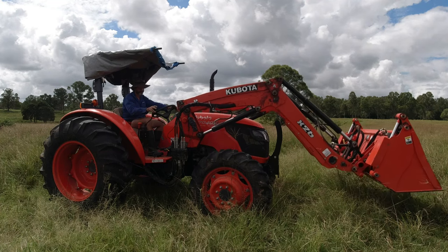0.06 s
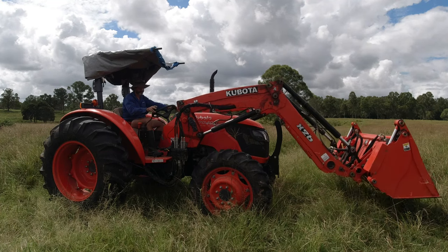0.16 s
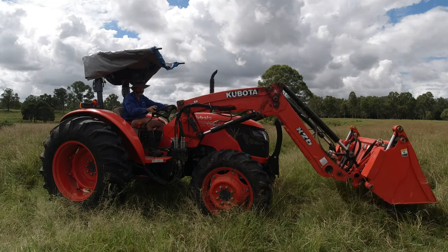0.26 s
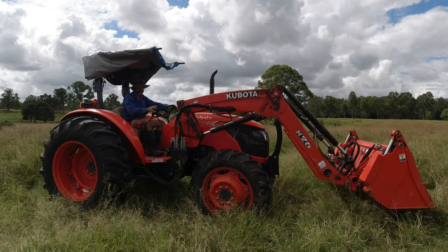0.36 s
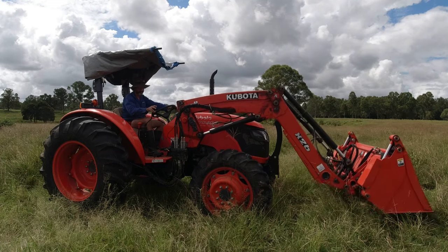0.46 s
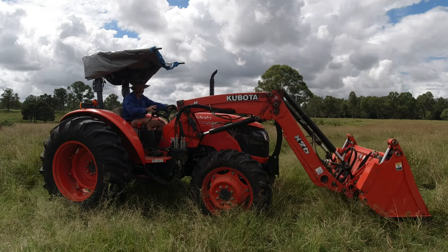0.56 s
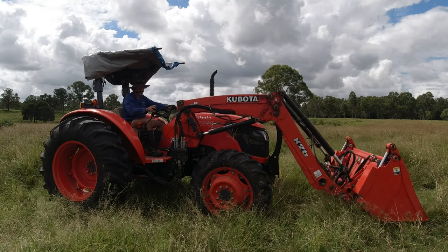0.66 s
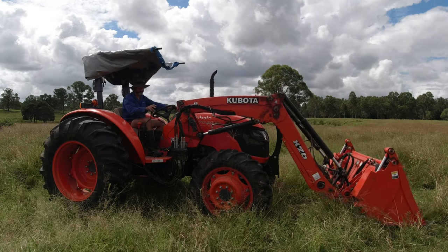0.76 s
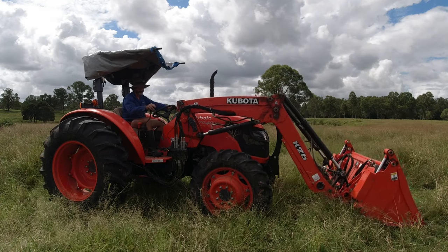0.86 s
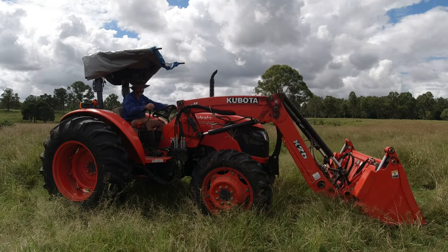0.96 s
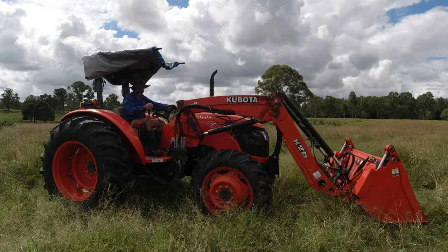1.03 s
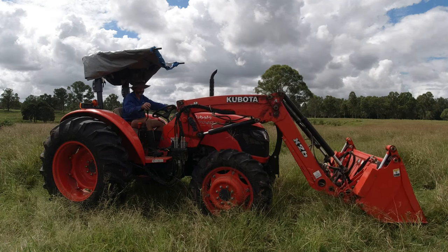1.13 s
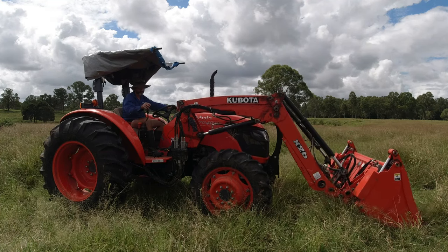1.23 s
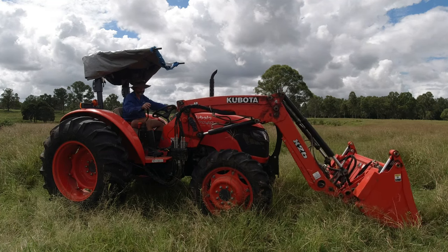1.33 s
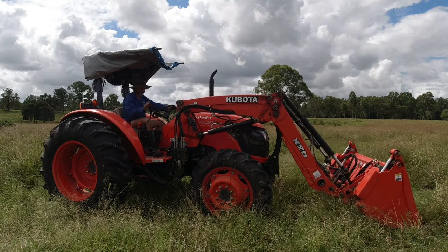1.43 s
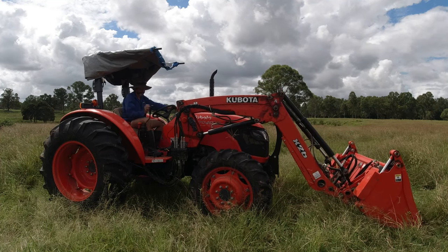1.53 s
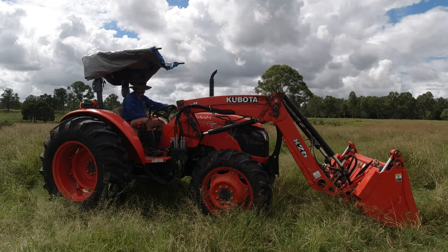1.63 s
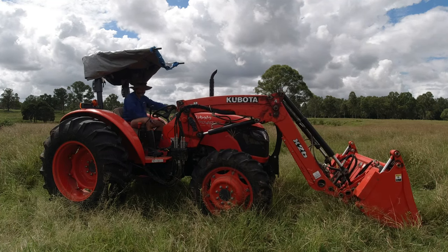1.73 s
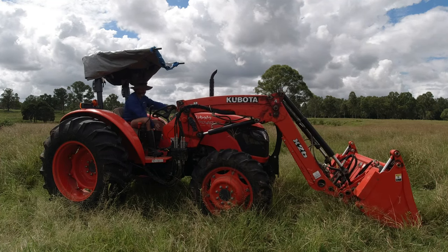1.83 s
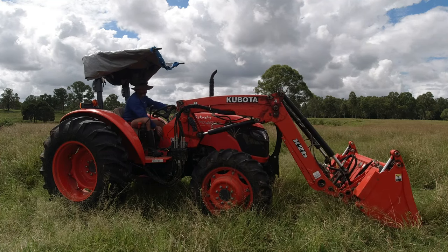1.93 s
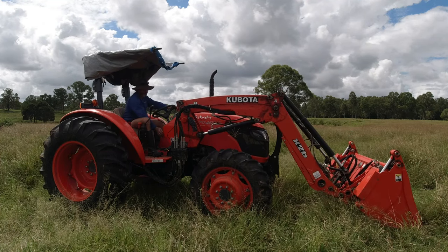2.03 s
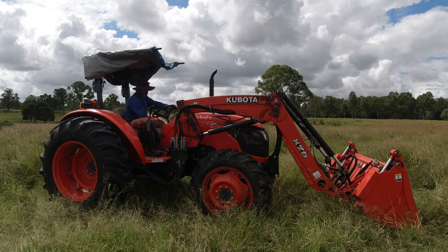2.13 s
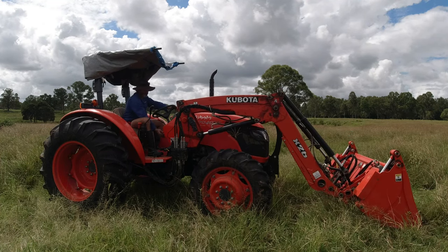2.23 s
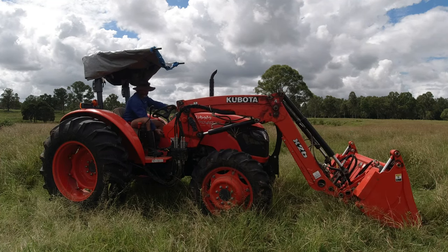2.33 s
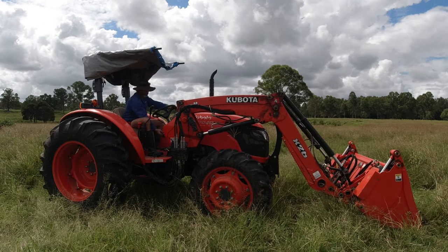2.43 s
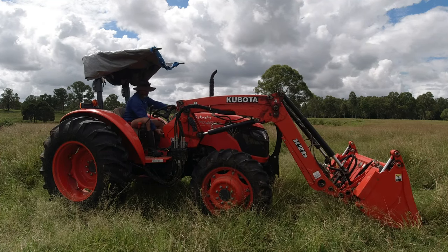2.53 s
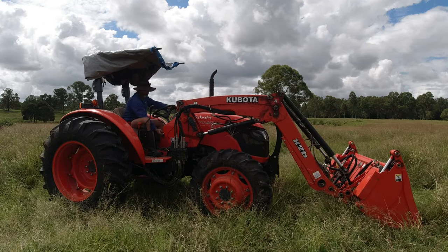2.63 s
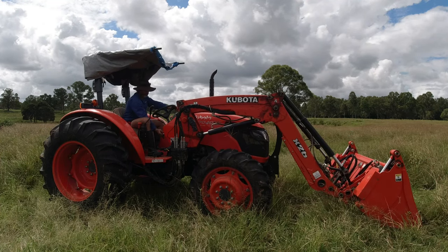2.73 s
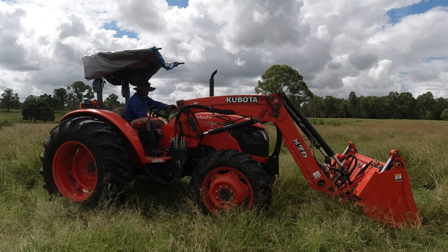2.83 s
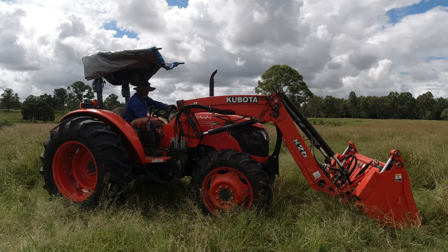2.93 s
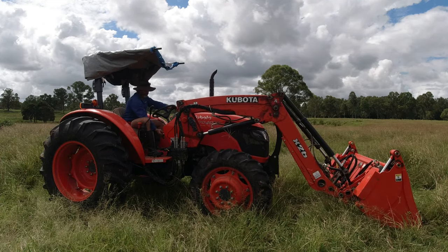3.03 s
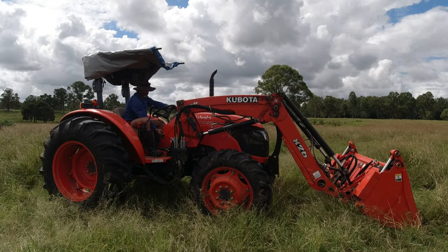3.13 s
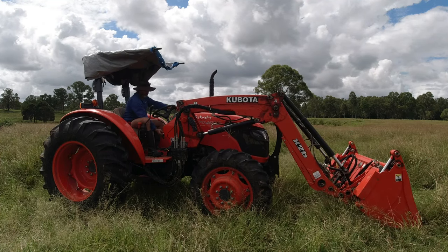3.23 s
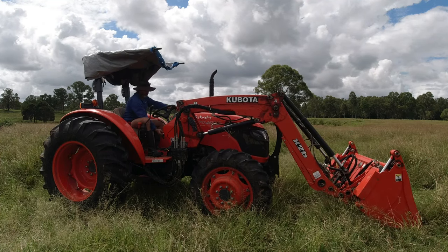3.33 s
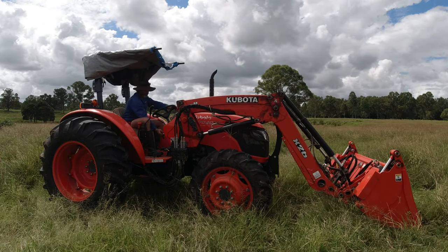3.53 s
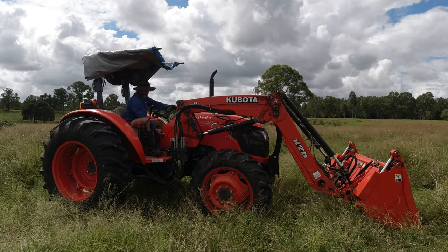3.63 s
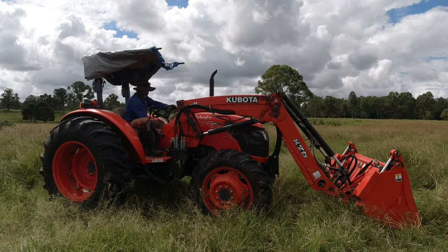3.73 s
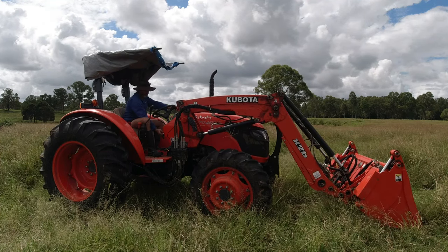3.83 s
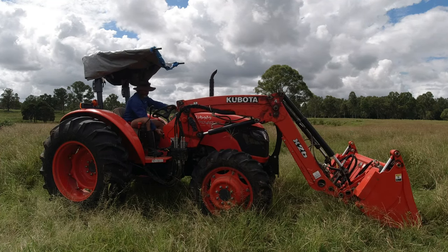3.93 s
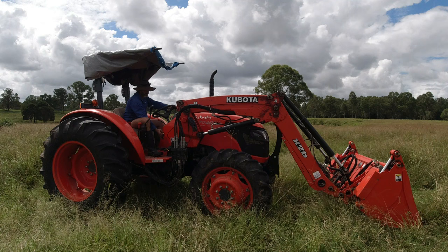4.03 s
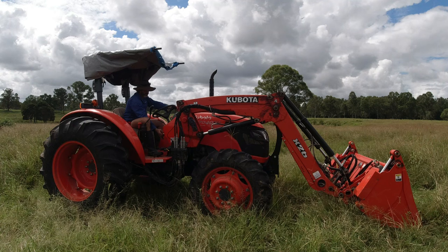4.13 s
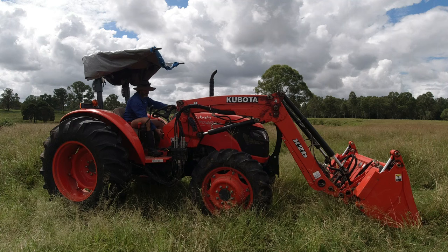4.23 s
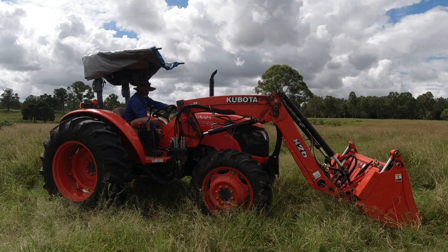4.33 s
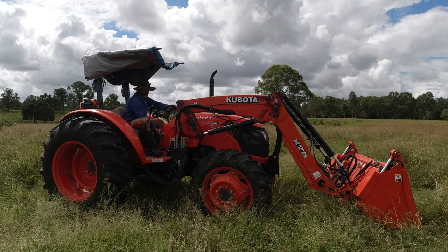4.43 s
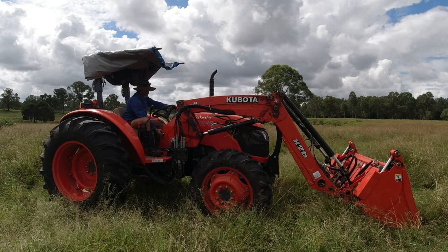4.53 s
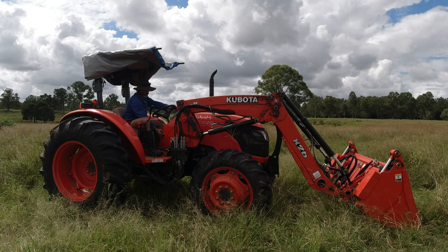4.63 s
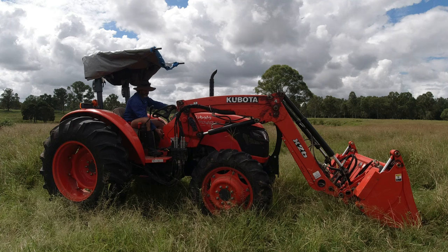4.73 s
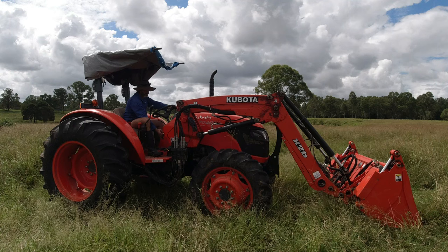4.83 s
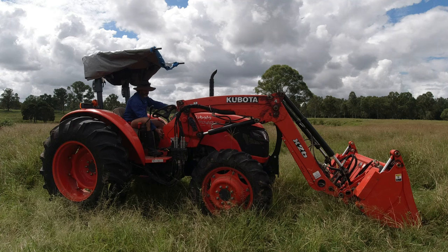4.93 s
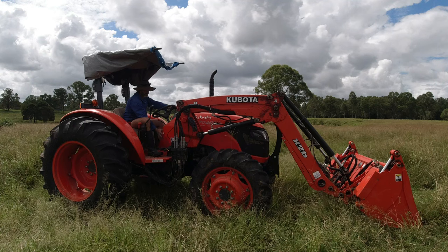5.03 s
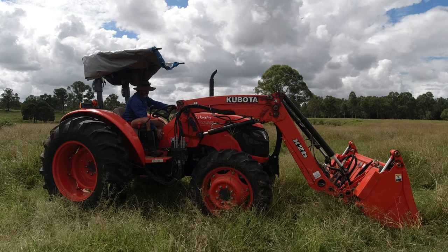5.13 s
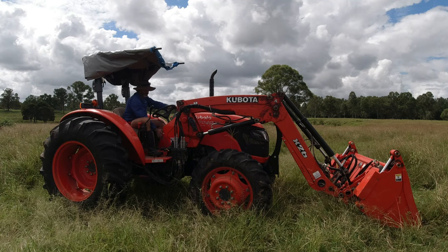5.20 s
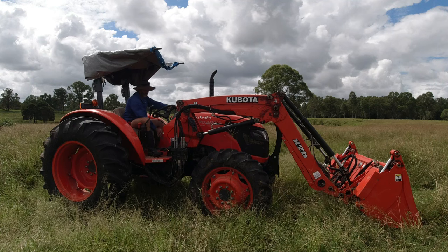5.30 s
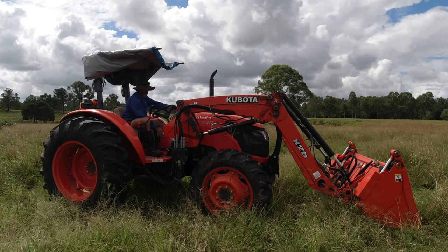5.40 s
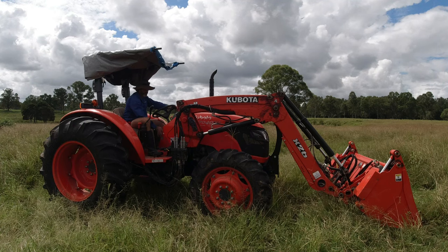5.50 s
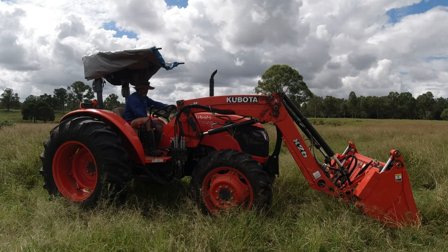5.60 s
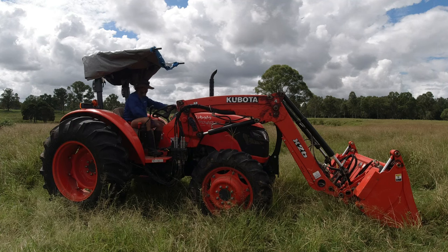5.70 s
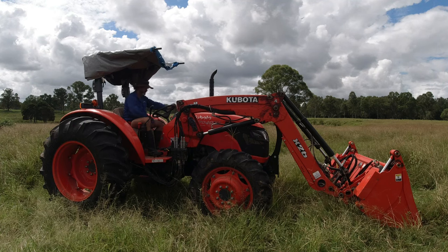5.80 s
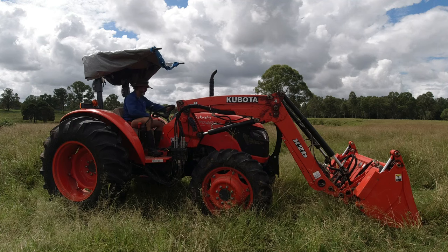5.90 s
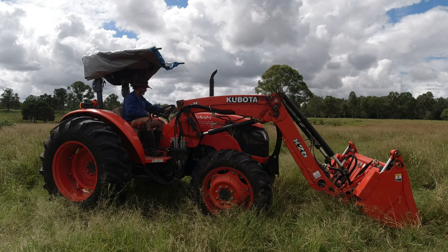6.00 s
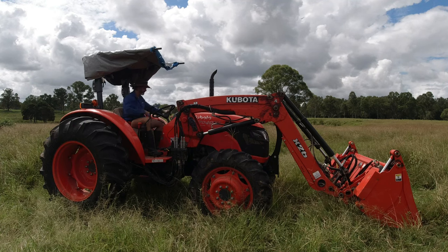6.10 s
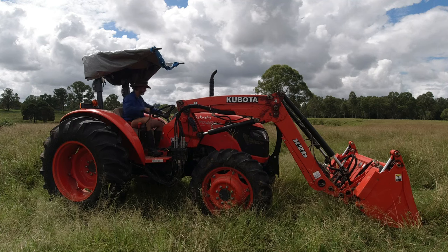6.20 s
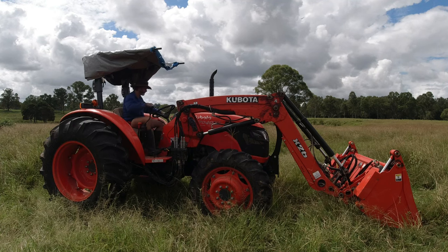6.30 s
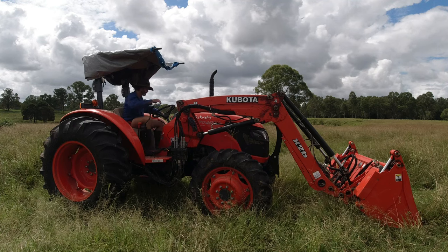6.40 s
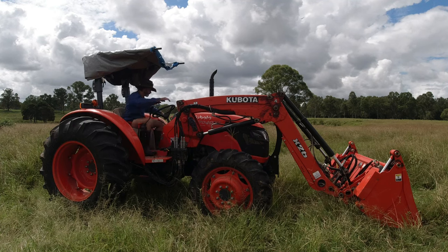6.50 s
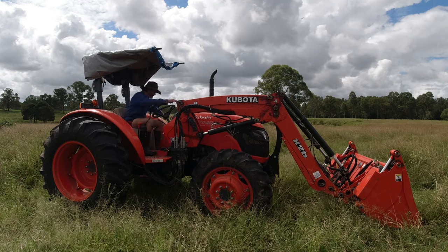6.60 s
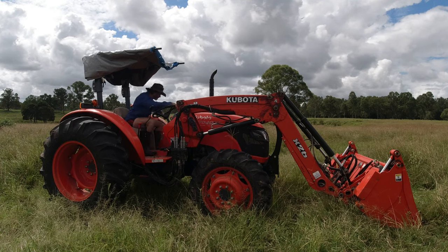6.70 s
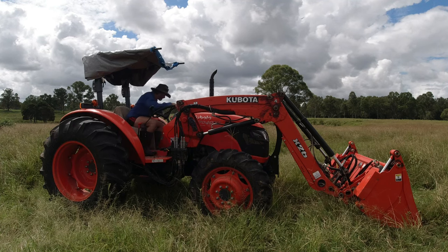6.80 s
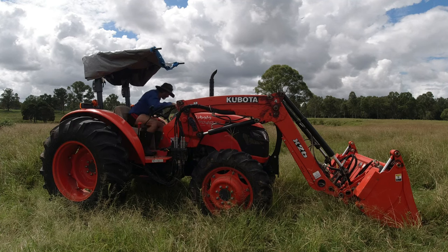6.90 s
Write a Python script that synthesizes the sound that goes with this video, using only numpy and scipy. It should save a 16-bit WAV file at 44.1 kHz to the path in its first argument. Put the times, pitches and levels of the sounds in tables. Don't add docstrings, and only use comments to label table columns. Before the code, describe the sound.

Tractor engine clattering at idle, a heavy steel bucket thud, then shutdown: strokes slow, loose metal rattles, leaving keys, seat creaks, insect and light wind.

```python
import sys
import numpy as np
from scipy import signal
from scipy.io import wavfile

SR = 44100
rng = np.random.default_rng(int(sys.argv[2]) if len(sys.argv) > 2 else 0)


def ratio_of_db(decibels):
    return 10 ** (np.asarray(decibels, float) / 20)


def unload_wav(signal):
    wavfile.write(
        sys.argv[1],
        SR,
        np.round(np.clip(np.atleast_2d(signal).T, -1, 1) * 32767).astype(np.int16),
    )


N = 306495
T = np.arange(N) / SR

# pitch in Hz, width in Hz, height in dB.
BLOCK_MODES = [(552.4, 56, 6), (625, 69, 5.5), (745, 41, 1.5), (833.5, 21, 6), (900, 50, 6.5),
               (955, 16.44, 6), (1081, 20, 7), (1167, 58, 2.5), (1430, 25, 1), (1696, 15, 7),
               (1770, 21, 4.5), (2250, 45, 3.5), (2453, 90.2, 4.5), (3800, 35, 6)]
# pitch in Hz, width in Hz, height in dB.
COAST_MODES = [(185, 30, 6.4), (412, 20, 3.6), (620, 56, 4.6), (800.63, 60, 10), (900, 36, 10.3),
               (1014, 38, 9.9), (1320, 17, 4.1), (1520, 26, 8.2), (2340, 27, 1.2), (3260, 300, 4.5),
               (4200, 300, 0.82)]


def evened(x):
    return x / np.sqrt(np.mean(x ** 2) + 1e-20)


def ramp(start_s, length_s):
    return np.clip((T - start_s) / length_s, 0, 1)


def burst(start_s, attack_s, end_s, release_s, db, drift_db):
    edges = ramp(start_s, attack_s) * np.clip((end_s - T) / release_s, 0, 1)
    return edges * ratio_of_db(db + drift_db * np.clip(T - start_s - attack_s, 0, end_s))


def noise():
    return rng.standard_normal(N)


def band(lo_hz, hi_hz, count):
    sos = signal.butter(4, [lo_hz, hi_hz], "bandpass", fs=SR, output="sos")
    return evened(signal.sosfilt(sos, rng.standard_normal(count + 500))[500:])


def colour(x, points, modes=(), size=16384):
    hz = abs(np.fft.fftfreq(size, 1 / SR))
    f, db = np.transpose(points)
    db = np.interp(np.log(hz + 1), np.log(f + 1), db)
    db = db + sum(top / (1 + (2 * (hz - at) / width) ** 2) for at, width, top in modes)
    gain = np.exp(np.conj(signal.hilbert(np.log(ratio_of_db(np.maximum(db, -100))))))
    response = np.fft.ifft(gain).real[:size // 2]
    return signal.oaconvolve(x, response)[:len(x)]


def ringing(modes, flicker_db=3.0, flicker_s=0.036):
    out, shaking = np.zeros(N), noise()
    for hz, width, db in modes:
        pole = np.exp((2j * np.pi * hz - np.pi * width) / SR)
        tone = signal.lfilter([1], [1, -2 * pole, pole ** 2], shaking).real
        flicker = np.interp(T, np.arange(1000) * flicker_s, rng.standard_normal(1000))
        out += ratio_of_db(db + flicker_db * flicker) * evened(tone)
    return evened(out)


def add(mix, s, sound):
    part = mix[round(s * SR):][:len(sound)]
    part += sound[:len(part)]


def wind():
    # centre in seconds, level in dB, width in seconds.
    gusts = [(2.27, -42, .2), (2.82, -35, .06), (3.2, -41, .2), (3.52, -33, .1), (3.9, -43, .3),
             (4.24, -36, .09), (4.5, -33, .13), (4.9, -50, .1), (5.33, -41, .15), (5.57, -36, .11),
             (5.9, -42, .22), (6.41, -46, .12), (6.7, -50, .15)]
    # pitch in Hz, level in dB per Hz.
    wind_colour = [(1, -7), (4, 0.5), (10, -12), (20, -16.5), (33, -26), (55, -27.5), (100, -48.5),
                   (300, -90)]
    calm_db = -52.5
    push = ratio_of_db(calm_db) + sum(ratio_of_db(db) * np.exp(-((T - s) / width) ** 2) for s, db, width in gusts)
    return push * evened(colour(noise(), wind_colour, size=65536))


def quiet_air():
    # pitch in Hz, level in dB per Hz.
    air_colour = [(47, -24), (80, -6.5), (250, -17), (337, -21), (547, -17.5), (763, -24), (1330, -27.5),
                  (3830, -39), (12400, -46), (12700, -46), (13300, -64), (15800, -63.5)]
    return ratio_of_db(-60) * evened(colour(noise(), air_colour))


def insect():
    # start in seconds, gap between chirps in seconds, level in dB.
    phrases = [
        (2.78, .267, -70),
        (3.745, .256, -69),
        (4.67, .261, -67),
        (5.615, .266, -68),
        (6.592, .268, -67),
    ]
    out, t = np.zeros(N), T[:SR // 30]
    swell = np.sin(np.pi * t / t[-1])
    for start, gap, db in phrases:
        for s in start + gap * np.arange(4):
            if s < T[-1]:
                add(out, s, ratio_of_db(db - 9.0) * swell * band(13850, 14300, len(t)))
    return out


def grass():
    # start, attack, end and release in seconds, level in dB, drift in dB per second.
    swish = (-.1, .1, 1.35, .6, -67, -3)
    out, t = burst(*swish) * band(8000, 14770, N), T[:SR // 20]
    add(out, 0, ratio_of_db(-39.5 - 60 * t / 0.049) * band(6000, 14550, len(t)))
    return out


def rustles():
    # start in seconds, peak level in dB.
    rustle_times = [
        (0.925, -47),
        (0.99, -55),
        (1.115, -46),
        (1.236, -54),
        (1.594, -46),
        (1.718, -52),
        (2.135, -52),
        (2.677, -38),
    ]
    out, t = np.zeros(N), T[:SR // 3]
    u = t / 0.02
    for s, db in rustle_times:
        add(out, s, ratio_of_db(db - 1.0) * u * np.exp(-u * u) * band(7500, 15600, len(t)))
    return out


def seat():
    # start, attack, end and release in seconds, level in dB, drift in dB per second.
    shifts = [
        (6.656, .01, 6.9, .03, -47, -60),
        (6.87, .012, 7.0, .004, -52, -15),
    ]
    # pitch in Hz, width in Hz, level in dB.
    seat_modes = [(101, 61, -2.5), (183, 73, -1), (388, 80, -4.5), (625, 101.4, -4.5), (1060, 370, -5.5),
                  (1310, 110, -6.5), (1860, 800, -9), (3280, 3000, -22)]
    # start, attack, end and release in seconds, level in dB, drift in dB per second.
    creak = (6.28, .03, 6.545, .03, -75, 40)
    rumble = sum(burst(*shift) for shift in shifts) * ratio_of_db(3.5) * ringing(seat_modes, 1.6, 0.018)
    creak_hz = 1000 + 95 * np.tanh((T - creak[0]) / (2 * 0.08))
    return rumble + burst(*creak) * np.sqrt(2) * np.sin(2 * np.pi * np.cumsum(creak_hz) / SR)


def clicks():
    # start in seconds, peak in dB, low Hz, high Hz, seconds
    # to fall 60 dB.
    small_parts = [(1.489, -33, 4300, 5100, .15), (1.488, -39, 6200, 7000, .15),
                   (1.49, -24, 2290, 3770, .3), (1.488, -26, 700, 2300, .15),
                   (2.664, -49, 7800, 12000, .065), (2.686, -36, 7600, 11000, .063),
                   (2.684, -45, 11000, 15700, .04), (2.707, -48, 8000, 10500, .08),
                   (3.729, -60, 5500, 12000, .07), (5.085, -56, 150, 1000, .33),
                   (5.298, -47, 9800, 14260, .039), (5.447, -66, 1750, 2100, .091),
                   (5.487, -59.5, 3480, 12500, .033), (5.955, -54, 200, 896, .15),
                   (6.495, -62.5, 2700, 3230, .082), (6.656, -54, 2400, 5000, .25),
                   (6.692, -65, 7500, 12000, .14), (6.795, -68, 7500, 11500, .16),
                   (6.74, -62, 1200, 3600, 1.5), (6.658, -52, 1400, 3000, .3),
                   (4.245, -46, 1500, 3000, .15), (6.91, -65, 3520, 6500, .06)]
    # start in seconds, peak in dB, low Hz, high Hz, seconds to
    # fall 60 dB.
    further_clashes = [
        (1.489, -46, 8300, 9150, 0.20746),
        (1.49, -53, 9400, 11500, .2),
        (1.489, -47, 4600, 7700, .1),
        (1.131, -50, 9000, 9600, 0.16),
        (6.694, -66, 1700, 5600, 0.0948),
        (6.8, -58, 90, 300, .3),
        (6.7, -62, 1500, 4500, .9),
        (5.19, -73, 2979, 3800, .08),
    ]
    out, t = np.zeros(N), T[:SR // 3]
    for s, db, lo_hz, hi_hz, t60 in small_parts + further_clashes:
        add(out, s, np.minimum(t / 0.0008, 1) * ratio_of_db(db - 60 * t / t60) * band(lo_hz, hi_hz, len(t)))
    return out


def ringing_key():
    # pitch in Hz, level in dB, seconds to fall 60 dB.
    key_modes = [(6660, -15, 0.189), (7853, -3, 0.16), (10300, 6, 0.098), (10800, 14, 0.061),
                 (12920, -8, 2.5), (13800, -6, .15)]
    out, t = np.zeros(N), T[:SR // 3]
    ring = sum(ratio_of_db(db - 60 * t / t60) * np.sin(2 * np.pi * hz * t) for hz, db, t60 in key_modes)
    damping = np.clip((.17 - t) / 0.032, 0, 1)
    add(out, 5.299, ratio_of_db(-61) * ring * damping)
    return out


def knocks():
    # start in seconds, peak in dB, treble in dB against the middle.
    crank_knocks = [(3.579, -18.5, -10.5), (3.677, -26.5, -17), (3.734, -45, -2.5), (3.816, -39, -6),
                    (3.852, -29.5, -13), (3.898, -40, -4.5), (3.986, -36, -11), (4.069, -49, -1),
                    (4.186, -41, -1), (4.245, -29, -14), (4.379, -38.5, -13), (4.457, -42.5, -11),
                    (4.601, -43, -5), (4.667, -35, -15), (4.785, -50, -20), (4.842, -52, -22),
                    (4.896, -45.5, -32), (4.952, -48.5, -21), (5.091, -53.5, -21), (5.125, -54, -33)]
    # start in seconds, peak in dB, treble in dB against the middle.
    cab_knocks = [
        (5.965, -56, -5),
        (6.465, -47, -10),
        (6.499, -48, -9),
        (6.657, -32.5, -24),
        (6.691, -47, -13),
        (6.746, -58, -11),
        (6.795, -42, -7),
        (6.872, -46, -12),
        (6.919, -42, -11),
    ]
    # low Hz, high Hz.
    bands_hz = [
        (230, 700),
        (700, 2400),
        (2400, 5000),
    ]
    out, t = np.zeros(N), T[:SR // 3]
    for s, db, bright_db in crank_knocks + cab_knocks:
        quiet = -26.5 - db
        low_db = -3.5 - 0.18 * (bright_db + 9) + 0.22 * quiet
        t60 = max(0.14 + 0.0032 * quiet, .03)
        for (lo, hi), rel_db, quick in zip(bands_hz, (low_db, 0, bright_db), (.8, 1, 1.2)):
            fall_db = -60 * quick * np.maximum(t - .015, 0) / t60
            shape = np.minimum(t / 0.0016, 1) * ratio_of_db(fall_db)
            add(out, s - 0.003004, ratio_of_db(db + rel_db - 13.0) * shape * band(lo, hi, len(t)))
    return colour(out, [(20, -0.5), (3500, -3.5), (4800, -8.5), (6000, -32)], COAST_MODES)


def steel_rings(rows):
    out = np.zeros(N)
    for s, db, hz, length in rows:
        u = np.linspace(0, 1, int(length * SR))
        sag = 1 - (.012 + 1.1 * length ** 2) * u
        add(out, s, ratio_of_db(db) * np.sin(np.pi * u ** 0.51) * np.sin(2 * np.pi * hz * length * u * sag))
    return out


def loose_steel():
    # start in seconds, level in dB, pitch in Hz, length in seconds.
    late_rings = [(3.68, -40, 190, 0.05), (3.85, -40, 190, 0.045), (4.03, -44, 184, 0.05),
                  (4.09, -52, 183, 0.11), (4.24, -49, 192, 0.11), (4.18, -50, 626, 0.06),
                  (4.24, -46, 631, 0.07), (4.39, -51, 620, 0.06), (4.15, -54, 1127, 0.07),
                  (3.92, -53, 1305, 0.1), (4.12, -56, 1497, 0.06), (4.4, -52, 1123, 0.04),
                  (4.4, -56, 1406, 0.04), (4.33, -50, 991, 0.08), (3.85, -48, 629, 0.05),
                  (4.91, -56, 617, 0.055), (5.098, -56, 173, 0.03), (4.67, -50, 417, 0.03),
                  (5.125, -54, 469, 0.025), (4.77, -56, 1022, 0.06), (4.89, -52, 997, 0.03),
                  (6.655, -41, 617, 0.03), (6.71, -43, 182, 0.04), (6.77, -50, 196, 0.07),
                  (6.72, -49, 377, 0.08), (6.68, -39, 87, 0.025), (6.73, -58, 1324, 0.1),
                  (6.89, -61, 1278, 0.05), (6.655, -53, 328, 0.04), (6.88, -54, 383, 0.04)]
    return ratio_of_db(1.0) * steel_rings(late_rings)


def oil_jet():
    # start, attack, end and release in seconds, level in dB, drift in dB per second.
    jet = (.18, .1, .72, .07, -64.5, -2)
    # pitch in Hz, width in Hz, level in dB.
    whistles = [(7493.5, 500, 2.5), (7930, 900, 1.5), (10550, 470, -5), (11100, 400, -10), (12950, 700, 2),
                (15100, 830, -8), (11000, 7600, 5.5)]
    return burst(*jet) * ratio_of_db(11.5) * ringing(whistles, 2.7, 0.085)


def bucket():
    # start, attack, end and release in seconds, level in dB, drift in dB per second.
    boom = (1.487, .01, 1.79, .04, -33, -10)
    # pitch in Hz, width in Hz, level in dB.
    panels = [(127, 40.6, 1.5), (337, 135, -3), (413, 106, -3), (557, 160, -5)]
    # start in seconds, level in dB, pitch in Hz, length in seconds.
    panel_rings = [
        (1.493, -9, 244, 0.026),
        (1.506, -12, 177, 0.039),
        (1.55, -24, 146, 0.065),
        (1.543, -14.5, 252, 0.02),
        (1.706, -11.5, 185.7, 0.05),
        (1.708, -15.5, 285, 0.025),
        (1.736, -21, 254, 0.038),
        (2.785, -25.5, 175, 0.2),
        (6.873, -46, 81.5, 0.08),
    ]
    # start in seconds, level in dB, pitch in Hz, length in seconds.
    shudders = [
        (1.575, -20, 218, 0.068),
        (1.6, -19.5, 150, 0.063),
        (1.61, -27, 278, .03),
        (1.64, -21.5, 249, 0.036),
        (1.65, -23, 169, 0.046),
        (1.672, -24, 240, 0.042),
        (1.75, -19.5, 168, 0.035),
    ]
    # start in seconds, level in dB, pitch in Hz,
    # length in seconds.
    further_rings = [(1.497, -24, 384, .03), (1.51, -27, 595, .03), (1.55, -33, 455, .03), (1.585, -24, 336, .03),
                     (1.555, -28, 663, .025), (1.625, -32, 428, .03), (1.705, -26, 380, .03),
                     (1.745, -25, 541, .04), (1.77, -29, 240, .03), (1.578, -20, 121, .034),
                     (1.525, -30, 480, .03), (1.605, -28, 320, .025), (1.66, -23, 130, .04),
                     (1.735, -15, 190, .035)]
    return burst(*boom) * ratio_of_db(4.5) * ringing(panels, 0.72) + steel_rings(panel_rings + shudders + further_rings)


def struck(modes, chance, spread_db, detune):
    t = T[:SR // 16, None]
    hz, db, t60 = np.transpose(modes)
    fading = ratio_of_db(db + spread_db * np.minimum(chance[0], 1) - 60 * t / t60)
    rings = fading * np.sin(2 * np.pi * hz * (1 + detune * chance[1]) * t)
    return rings * np.minimum(t / 0.0028, 1)


def loose_pings(burn, level_db):
    # pitch in Hz, level in dB, seconds to fall 60 dB.
    parts = [(885, -30, 0.055), (1091, -27.5, 0.081), (1725, -33, 0.064), (2235, -33.5, 0.048),
             (2504, -33, 0.052), (3370, -42, .06), (3700, -49, 0.038), (4300, -44, 0.074), (4860, -50, .05),
             (6040, -56.5, .04), (6680, -59, 0.037), (7840, -57, .04), (8500, -59, 0.042), (9408, -65, .04)]
    out = np.zeros(N)
    for at in np.flatnonzero(np.diff(burn.astype(int))):
        chance = rng.standard_normal((3, len(parts)))
        rings = struck(parts, chance, spread_db=3.0, detune=.02).T
        for late, ring in zip(chance[2], rings):
            add(out, at / SR + .008 * abs(late), ratio_of_db(level_db[at]) * ring)
    return out * np.clip((3.62 - T) / 0.045, 0, 1)


def dry_strokes():
    # start in seconds, level in dB.
    strokes = [(2.779, -21.5), (2.82, -34), (2.895, -24.5), (2.94, -22), (3.025, -27), (3.077, -32),
               (3.13, -29), (3.182, -26), (3.24, -25), (3.301, -24.5), (3.378, -31), (3.397, -41),
               (3.459, -24.5), (3.545, -35), (3.643, -37), (3.677, -37), (3.817, -42), (3.856, -34),
               (3.987, -39), (4.186, -41), (4.247, -40), (4.379, -46), (4.669, -43), (4.898, -53),
               (4.599, -49), (4.953, -55)]
    # pitch in Hz, level in dB, seconds to fall 60 dB.
    block_tones = [(622, -9, 0.061), (852, -3, 0.13), (934, -1.5, 0.096), (1000, -5, 0.06),
                   (1798, -7, 0.072), (2490, -16, .06), (3730, -15, 0.058)]
    out = np.zeros(N)
    for s, db in strokes:
        chance = rng.standard_normal((2, len(block_tones)))
        add(out, s, ratio_of_db(db) * struck(block_tones, chance, 2.2, 0.013).sum(1))
    return out


def hard_raps():
    # start in seconds, peak level in dB.
    raps = [(0.087, -24), (0.1571, -17), (0.228, -22), (0.3312, -18), (0.6024, -10), (0.671, -17),
            (0.702, -14), (0.9443, -13), (1.0121, -23), (1.081, -20), (1.1186, -14), (1.185, -13),
            (1.2172, -16), (1.3543, -15), (1.385, -15), (1.489, -15), (1.5534, -22), (1.6233, -21),
            (1.8297, -19), (1.929, -25), (2.063, -12), (2.197, -19), (2.299, -19), (2.369, -19),
            (2.4361, -15.5), (2.503, -17), (2.534, -18), (2.5711, -19), (2.604, -22), (2.6684, -14),
            (2.779, -21), (2.94, -23), (3.025, -21), (3.676, -32), (3.817, -38), (4.185, -40), (4.898, -46),
            (4.955, -51), (5.092, -53)]
    out, t = np.zeros(N), T[:SR // 30]
    tick = np.sin(2 * np.pi * 1500 * t) * ratio_of_db(9.0 - 60 * t / 0.0065)
    tick += np.sin(2 * np.pi * 1040 * t) * ratio_of_db(4.0 - 60 * (t - .004) ** 2 / .0004)
    for s, db in raps:
        rattle = np.minimum(t / 0.00085, 1) * band(800, 4400, len(t))
        add(out, s - .001, ratio_of_db(db - 12.0 - 60 * t / .06) * (rattle + tick))
    return colour(out, [(500, -0.5), (1200, 3.0), (4500, -10.5)], BLOCK_MODES)


def coasting():
    # start, attack, end and release in seconds, level in dB, drift in dB per second.
    spinning = (3.5, 0.32, 5, 0.17, -46.5, -10.5)
    # start, attack, end and release in seconds, level in dB, drift in dB per second.
    shaking = (2.9, .004, 4.1, .45, -39.5, -14)
    # pitch in Hz, level in dB per Hz.
    coast_colour = [(59, -33), (100, 3), (414, 1.5), (475, -1), (976, -3.5), (1220, -1.5), (1500, -4),
                    (2000, -11), (2220, -12.5), (6000, -34), (7800, -73), (13200, -120)]
    # pitch in Hz, width in Hz, level in dB.
    coast_rings = [(983, 71.44, -1), (1246, 80, -10), (2310, 79, -14), (3470, 550, -23), (400, 200, -10),
                   (704, 160, -2.5)]
    jerk_db = 11 * np.exp(-abs(T - spinning[0]) / 0.046)
    spin = burst(*spinning) * ratio_of_db(jerk_db)
    rumble = evened(colour(noise(), coast_colour, COAST_MODES))
    rings = ratio_of_db(-8.0) * ringing(coast_rings, 3.5, 0.05)
    return spin * (rumble + rings) + burst(*shaking) * ratio_of_db(-3.0) * band(65, 127, N)


def exhaust(speed, turns, unfuelled):
    # multiple of half the firing rate, level in dB.
    orders = [(1, -34), (2, 0), (4, -3), (5, -23), (6, -4), (7, -12), (8, -5), (9, -22), (10, -22),
              (11, -21), (12, -26), (14, -22), (16, -15), (20, -21)]
    tones = np.zeros(N)
    for k, db in orders:
        swell_db = 4.5 * unfuelled / (1 + ((k * speed / 2 - 100) / 39) ** 2)
        shift = .1 * np.sign(k - 4.5) + .065 * (k % 4 == 2)
        tones -= ratio_of_db(db + swell_db) * np.cos(2 * np.pi * (k * turns / 2 + shift))
    return evened(tones)


def frame_drone(swell, unfuelled):
    # pitch in Hz, level in dB per Hz.
    frame_colour = [(60, -43.5), (125, -1.5), (200, -6), (340, -9), (440, -9), (620, -35.5), (1000, -81.5)]
    # pitch in Hz, width in Hz, height in dB.
    frame_modes = [(142.2, 8.5, 3), (184, 14, 5.4), (237, 20, 2.3)]
    drone = evened(colour((1 + 0.19 * swell) * noise(), frame_colour, frame_modes))
    return ratio_of_db(-6 - 3.5 * ramp(1.82, .1) - 1.26 * unfuelled) * drone


def block_clatter(turns, burn, slower, blow, swell, valve):
    # pitch in Hz, level in dB per Hz.
    clatter_colour = [(60, -67), (300, -32.5), (480, -13), (667, -13), (1090, -9), (1320, -14),
                      (1720, -13.5), (2600, -21.5), (4150, -25.5), (5200, -45.5), (7000, -71.5)]
    # pitch in Hz, level in dB per Hz.
    bark_colour = [(350, -40), (650, -6), (1080, 0), (1250, -6), (1800, -40), (4000, -100)]
    chatter = rng.standard_normal(6000)[(turns * 1500).astype(int) % 6000]
    jostle = noise() + 0.5 * chatter
    jostle *= 1 + 3 * (rng.random(N) < 500 / SR)
    drive = (1.0 / slower ** 0.29 + swell + valve) * jostle
    first_rap = np.diff((burn - .12).astype(int), prepend=0)
    second_rap = np.diff((burn - .3).astype(int), prepend=0)
    drive -= 4 * blow * (first_rap + 0.93 * second_rap)
    clatter = evened(colour(drive, clatter_colour, BLOCK_MODES))
    since = burn % 1
    barking = np.clip(np.minimum(since - .2, .5 - since) / 0.06, 0, 1)
    bark = evened(colour(blow * barking * jostle[::-1], bark_colour, BLOCK_MODES))
    return evened(clatter + ratio_of_db(-12) / slower ** 2 * bark)


def combustion_fizz(since, slower, swell, valve):
    # pitch in Hz, level in dB per Hz.
    fizz_colour = [(3500, -29), (4600, -4.5), (5670, -13.5), (6500, -11.5), (7140, -18.5), (8700, -16.5),
                   (11400, -28), (13200, -32.5), (14200, -48)]
    puff = 1.2 * swell ** 2.5 * np.minimum(since / 0.18, 1)
    return evened(colour((0.87 / slower ** 0.42 + puff + valve) * noise(), fizz_colour))


def effort(speed, unfuelled):
    stall_db = -8 * ramp(3.56, 0.12)
    jolt = np.exp(-((T - 1.54) / 0.058) ** 2)
    speed_db = 20 * np.log10(speed / 30.55)
    exhaust_db = -3 * unfuelled + 2.2 * speed_db + 4 * jolt + stall_db
    clatter_db = -2.5 * unfuelled + 0.88 * speed_db + 0.55 * jolt + stall_db
    fizz_db = -5 * unfuelled + 0.6 * speed_db + 3 * jolt + stall_db
    return exhaust_db, clatter_db, fizz_db


def engine():
    # time in seconds, firings per second.
    speed_points = [(0.0, 29.29), (0.4, 29.45), (0.8, 29.11), (1.2, 29.33), (1.5, 29.62), (1.8, 29.25),
                    (2.2, 29.85), (2.5, 29.6), (2.7, 29.19), (2.85, 25.74), (3.0, 21.8), (3.15, 18.2),
                    (3.3, 14.4), (3.41, 11.8), (3.5, 11.6), (3.75, 9.64), (4.2, 3.79)]
    cylinder_db = [-1.84, -1.6, -0.69, -1.4]
    speed = np.interp(T, *np.transpose(speed_points))
    turns = .057 + np.cumsum(speed) / SR
    slower = (speed_points[0][1] / speed) ** 0.4
    unfuelled = ramp(2.606, 0.24)
    burn = turns + 0.418
    firing, since = burn.astype(int), burn % 1
    blow = ratio_of_db(np.take(cylinder_db, firing % 4) + 1.9 * rng.standard_normal(400)[firing])
    swell = blow * np.minimum(since / 0.07, 1) * np.cos(np.pi / 2 * since) ** (1.7 * slower)
    valve = 0.096 * np.exp(-((since - .72) / 0.0545) ** 2)

    exhaust_db, clatter_db, fizz_db = effort(speed, unfuelled)
    clatter = ratio_of_db(-1.0) * block_clatter(turns, burn, slower, blow, swell, valve)
    clatter += frame_drone(swell, unfuelled)
    running = ratio_of_db(exhaust_db - 25 + 2.0) * exhaust(speed, turns, unfuelled)
    running += ratio_of_db(clatter_db - 24.5 + 0.5) * clatter
    running += ratio_of_db(fizz_db - 56.5 + 2.0) * combustion_fizz(since, slower, swell, valve)
    running *= np.clip((3.85 - T) / 0.24, 0, 1)
    return running + coasting() + loose_pings(burn, clatter_db) + dry_strokes()


def scene():
    # pitch in Hz, level in dB of the sides against the centre.
    spread = [(2000, -83), (2900, -41), (3300, 0), (4400, -22.5), (5200, -10), (8000, -4.5), (15000, -9)]
    mid = wind() + quiet_air() + insect() + grass() + rustles()
    mid += seat() + clicks() + ringing_key() + knocks() + loose_steel()
    mid += oil_jet() + bucket() + hard_raps() + engine()
    z = signal.stft(mid, nperseg=256)[2]
    random_turns = np.exp(2j * np.pi * rng.random(z.shape))
    scattered = signal.istft(abs(z) * random_turns, nperseg=256)[1][:N]
    side = colour(scattered, spread) + ratio_of_db(-80.5) * band(3200, 12700, N)
    return np.array([mid + side, mid - side])


def roll_off(x):
    return signal.sosfilt(signal.butter(12, 15720, fs=SR, output="sos"), x)


def record(dry):
    return roll_off(dry)


dry = scene()
out = record(dry)
unload_wav(out)
```